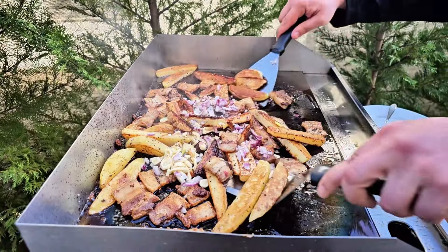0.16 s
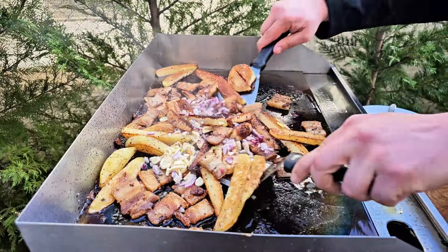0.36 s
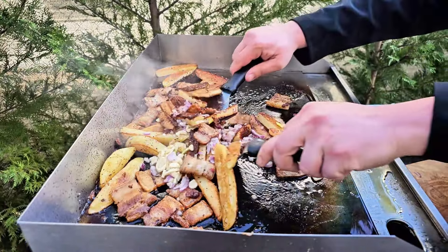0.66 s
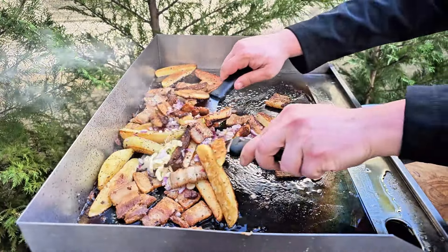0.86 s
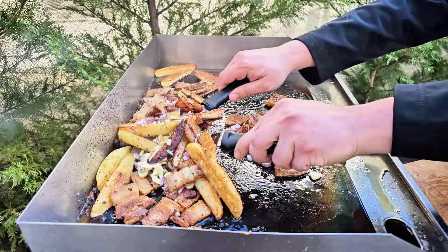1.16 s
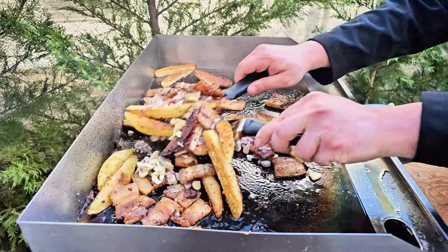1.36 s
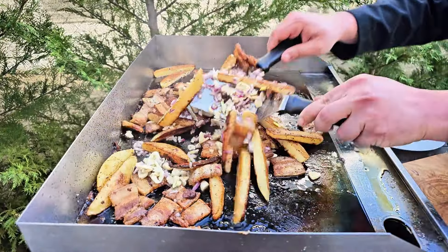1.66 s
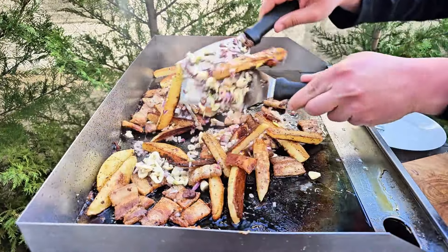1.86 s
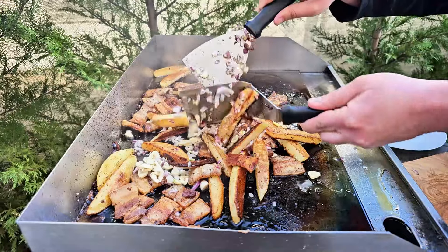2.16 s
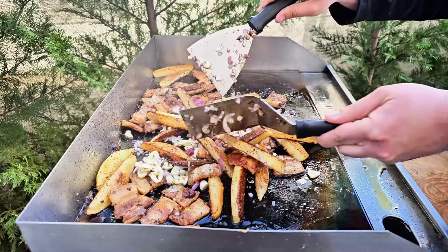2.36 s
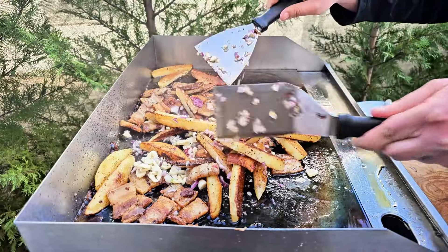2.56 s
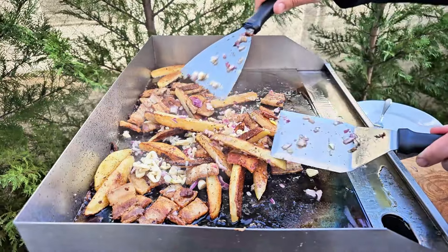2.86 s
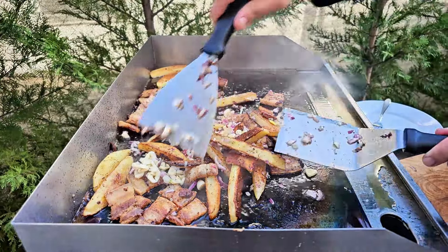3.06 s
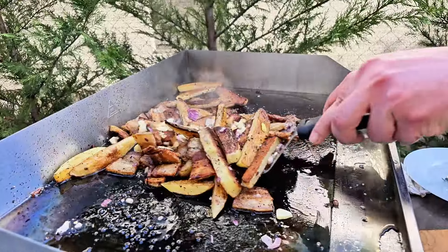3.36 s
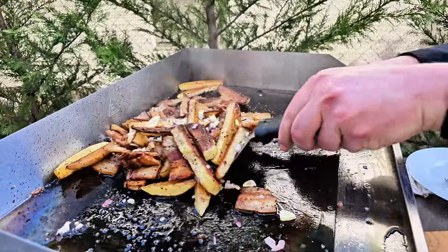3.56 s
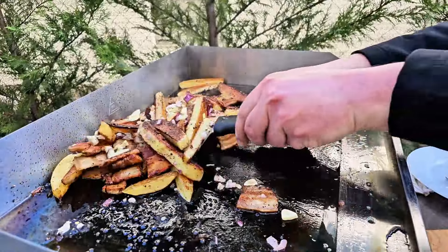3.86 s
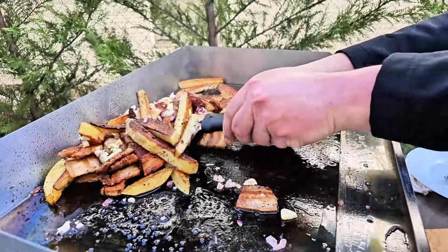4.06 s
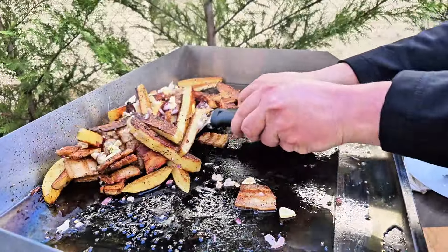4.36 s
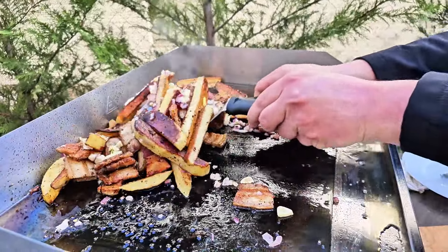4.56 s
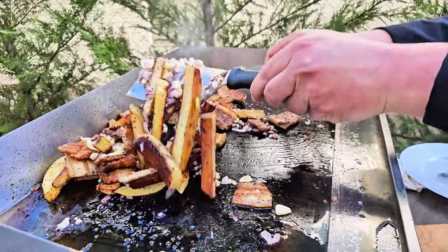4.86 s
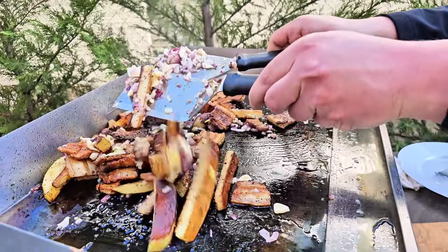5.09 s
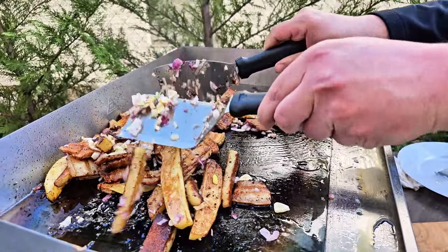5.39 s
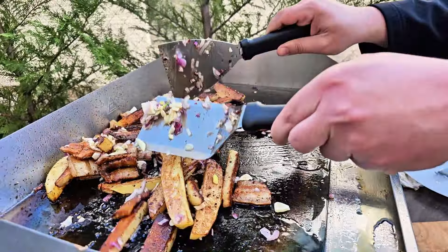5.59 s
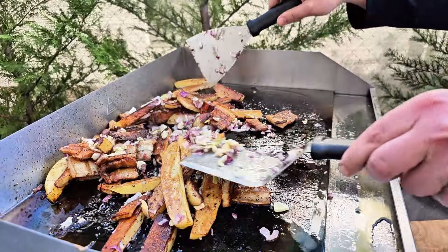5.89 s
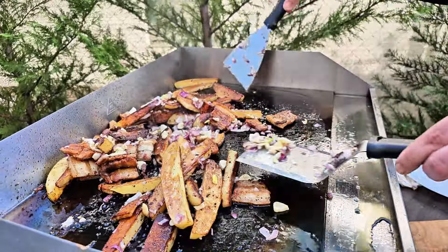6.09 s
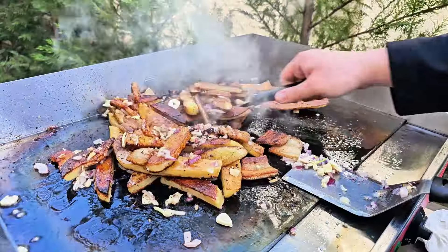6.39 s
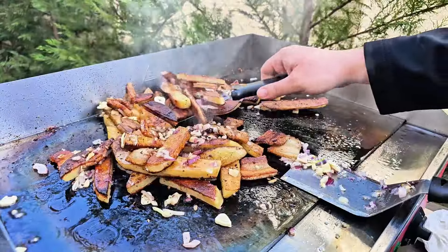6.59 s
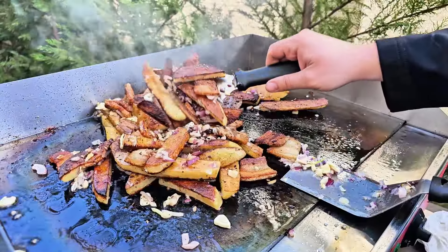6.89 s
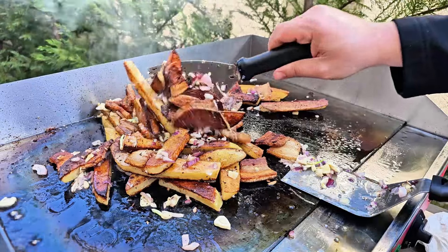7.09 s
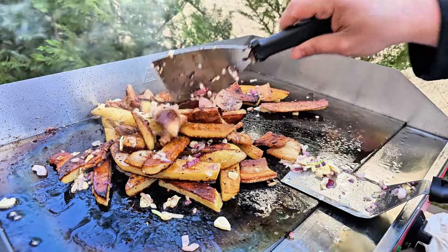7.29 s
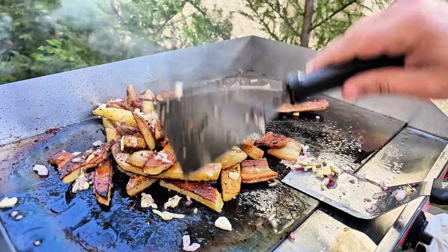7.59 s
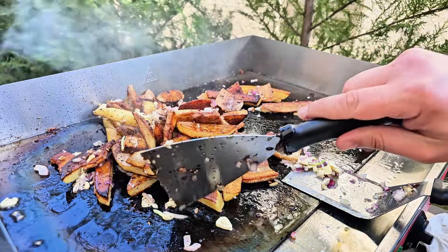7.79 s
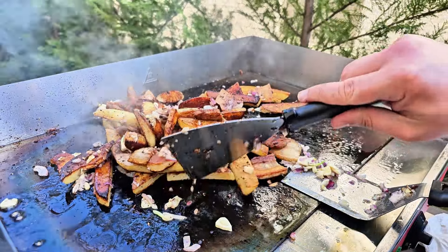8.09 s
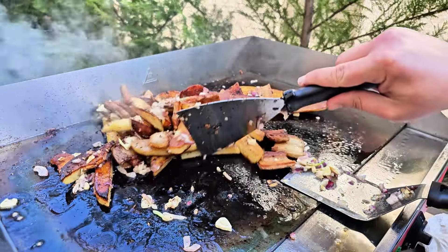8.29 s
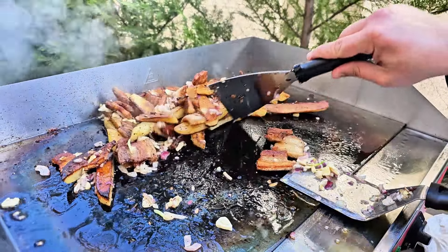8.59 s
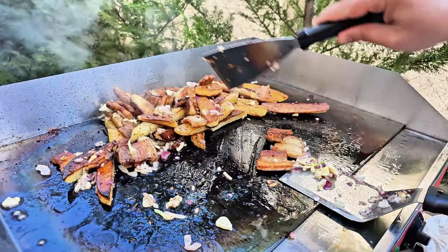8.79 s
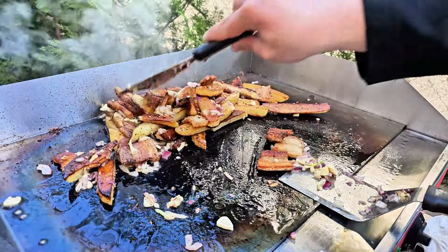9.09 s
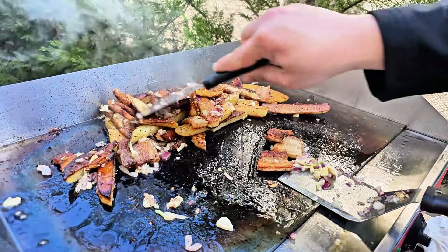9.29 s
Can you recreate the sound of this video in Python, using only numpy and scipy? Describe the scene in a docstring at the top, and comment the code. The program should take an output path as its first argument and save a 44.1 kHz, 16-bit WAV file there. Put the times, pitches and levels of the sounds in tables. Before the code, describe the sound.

Potato wedges and meat fry outdoors, hissing and popping while spatulas slide under them, then clank and scrape on the steel plate.

```python
"""Sizzling outdoor griddle

Potato wedges and meat fry on a steel plate: steam bubbles fizz and fat spits, flaring up as two
spatulas turn the food. Food thuds on the plate; one spatula clanks down and scrapes along the steel.
The microphone stands at three places in turn (front, close, side), over a low rumble.
Wind buffets it at the second place, and a faint hum is heard at the third."""
import sys
import numpy as np
from scipy import signal
from scipy.fft import rfft, irfft, next_fast_len
from scipy.io import wavfile
from scipy.ndimage import uniform_filter1d

SR = 44100
rng = np.random.default_rng(int(sys.argv[2]) if len(sys.argv) > 2 else 0)


def generate_wav(signal):
    """Clip the signal to [-1, 1] and save it as 16-bit WAV at the path in sys.argv[1]."""
    frames = np.transpose(np.atleast_2d(signal))
    scaled = np.clip(frames, -1, 1) * 32767
    pcm = np.round(scaled).astype(np.int16)
    wavfile.write(sys.argv[1], SR, pcm)


N = 416744
TIME, FREQS = np.arange(N) / SR, np.fft.rfftfreq(N, 1 / SR)
FRONT, CLOSE, SIDE = range(3)
TOP_HZ = 15800


def amp(db):
    """Decibels to gain."""
    return 10 ** (np.asarray(db) / 20)


def unit_rms(x):
    """Scales a signal to rms 1."""
    return x / np.sqrt(np.mean(x ** 2) + 1e-20)


def curve(points, hz):
    """Joins (frequency, value) points on a log-frequency axis."""
    f, value = np.transpose(points)
    return np.interp(np.log(hz + 1), np.log(f + 1), value)


def add(mix, start, sound):
    """Lays a sound into the mix at start seconds."""
    part = mix[max(round(start * SR), 0):][:len(sound)]
    part += sound[:len(part)]


def bell(hz, centre_hz, octaves):
    """A bell-shaped gain on the octave axis."""
    return np.exp(-.5 * (np.log2((hz + 1) / centre_hz) / octaves) ** 2)


def bandpass(x, centre_hz, octaves):
    """A sound through a bell filter, at rms 1."""
    return unit_rms(irfft(rfft(x) * bell(np.fft.rfftfreq(len(x), 1 / SR), centre_hz, octaves)))


def noise(colour):
    """Steady noise with the given spectrum, rms 1."""
    return unit_rms(irfft(rfft(rng.standard_normal(N)) * amp(curve(colour, FREQS)), N))


def wander(hz):
    """Smooth random modulation at rms 1, rolling off above hz."""
    size = next_fast_len(N, True)
    spectrum = rfft(rng.standard_normal(size)) / (1 + (np.fft.rfftfreq(size, 1 / SR) / hz) ** 2)
    return unit_rms(irfft(spectrum, size)[:N])


def clicks(per_s, spread_db):
    """Randomly timed clicks of either sign; most are small, a few large."""
    size = amp(spread_db * np.minimum(rng.exponential(1, N), 5))
    return size * rng.choice([-1, 1], N) * (rng.random(N) < per_s / SR)


def swell(start, length, rise_s, fall_s):
    """An envelope that rises, holds until its length is up, and dies away."""
    attack = np.clip((TIME - start) / rise_s, 0, 1)
    return attack * np.exp(-np.maximum(TIME - start - length, 0) / fall_s)


def ride(swells, floor_db, rise_s, fall_s):
    """A fader ride: swells on top of a steady floor."""
    return amp(floor_db) + sum(amp(db) * swell(s, length, rise_s, fall_s) for s, length, db in swells)


def mic_place():
    """Where the microphone stands at each sample: FRONT, CLOSE or SIDE."""
    return np.searchsorted([move[0] for move in MIC_MOVES], TIME)


# tone of the outdoor bed: (frequency [Hz], level [dB])
RUMBLE_EQ = [(20, -38), (45, -13), (80, 3), (130, -8.5), (200, -4), (400, -38), (1000, -48)]
# swells of the bed: (start [s], length [s], level [dB])
RUMBLE_SWELLS = [(1.78, 0.14, -63), (2.85, 0.14, -60), (6.35, 0.37, -54), (7.1, 1.4, -65)]


def rumble(heave_db=0.5):
    """A low outdoor rumble that heaves gently."""
    level = ride(RUMBLE_SWELLS, floor_db=-63, rise_s=0.1, fall_s=0.18)
    return noise(RUMBLE_EQ) * level * amp(heave_db * wander(hz=4.2))


# swells of the hum: (start [s], length [s], level [dB])
HUM_SWELLS = [(6.373, 0.12, -54), (7.437, 0.85, -52)]


def hum(pitch_hz=162.5, sag_hz_per_s=2.8, wobble_hz=2.08, waver_db=4.0):
    """A faint wavering hum at the side position, slowly sinking in pitch."""
    arrival = MIC_MOVES[1][0]
    hz = pitch_hz - sag_hz_per_s * (TIME - arrival) + wobble_hz * wander(hz=7.1)
    tone = np.sqrt(2) * np.sin(2 * np.pi * np.cumsum(hz) / SR)
    level = ride(HUM_SWELLS, floor_db=-68.5, rise_s=0.11, fall_s=0.16)
    return tone * level * amp(waver_db * wander(hz=4.4)) * (mic_place() == SIDE)


# tone of wind on the microphone: (frequency [Hz], level [dB])
WIND_EQ = [(15, -47), (25, -61), (56, -1), (91, 2), (200, -7.5), (274, -13), (385, -20.5), (450, -21),
           (580, -24), (990, -120)]
# gusts: (start [s], length [s], level before trim [dB])
GUSTS = [(3.17, 0.21, -38.5), (3.41, 0.11, -39), (3.745, 0.054, -41), (3.907, 0.024, -52),
         (4.095, 0.025, -39), (4.32, 0.062, -41), (4.535, 0.11, -44), (4.77, 0.063, -28),
         (4.933, 0.36, -37.5), (5.425, 0.14, -34.5), (5.63, 0.064, -33.5), (5.795, 0.019, -38.5),
         (5.894, 0.32, -35.5), (6.262, 0.041, -28), (6.367, 0.019, -33)]
# single thumps of wind: (time [s], level [dB], pitch [Hz])
WIND_THUMPS = [(3.324, -23.5, 122), (4.125, -30, 122), (4.214, -27.5, 96), (4.822, -21, 107),
               (5.183, -20, 167), (5.927, -30, 110), (6.29, -37, 84), (6.303, -21.5, 127)]


def wind(trim_db=-2, lumpy_db=2.5):
    """Gusts over a light breeze make lumpy eddies on the microphone, with a few single thumps."""
    strength = ride(GUSTS, floor_db=-46.5, rise_s=0.013, fall_s=0.011)
    out = noise(WIND_EQ) * strength * amp(trim_db + lumpy_db * wander(hz=47)) * (mic_place() == CLOSE)
    t = np.arange(SR // 10) / SR
    for s, db, hz in WIND_THUMPS:
        envelope = np.exp(-((hz * t - 1.4) / 0.72) ** 2)  # about two cycles long
        add(out, s - 1 / hz, amp(db) * np.sin(2 * np.pi * hz * t) * envelope)
    return out


def friction(length_s, modes, grit_db, locking):
    """Uneven slips of a sliding blade pass through resonances, fading in and out over the stroke."""
    size = SR * 2
    hz = np.fft.rfftfreq(size, 1 / SR)
    roughness = unit_rms(uniform_filter1d(rng.standard_normal(size), size=500))
    slips = clicks(per_s=1700, spread_db=2.0)[:size] * amp(grit_db * roughness)
    body = sum(amp(db) * (1 + 1j * (hz - f) / (.78 * width)) ** -2 for f, width, db in modes)
    rub = irfft(rfft(slips) * body, size)[:round(length_s * SR)]
    # the slips lock on to a sharp resonance, which steadies its loudness
    steadiness = locking / (1 + (modes[0][1] / 80) ** 2)
    envelope = abs(signal.hilbert(unit_rms(rub))) + .05
    return unit_rms(rub / envelope ** steadiness) * signal.windows.tukey(len(rub), .6)


# resonances of each spatula, by name: (frequency [Hz], width [Hz], level [dB])
SPATULA_MODES = {"scraper": [(1850, 120, -1), (2260, 210, -1), (3370, 200, 1), (3970, 230, -2.5),
                 (5500, 220, -1), (6480, 240, -1), (8700, 900, -1)], "turner": [(1340, 180, 0),
                 (1850, 140, -6), (3000, 500, -2), (3600, 280, -3), (5200, 380, -4), (7200, 150, -5),
                 (8650, 300, -15)]}
# light slides under the food: (spatula, start [s], end [s], level [dB], tone centre [Hz])
STROKES = [("scraper", 0.03, 0.8, -41.5, 2700), ("scraper", 0.35, 0.91, -40, 4400),
           ("scraper", 1.03, 1.68, -46, 4500), ("scraper", 1.2, 2.4, -47, 2800),
           ("turner", 2.6, 2.95, -43, 3700), ("turner", 3.13, 3.33, -39, 2800),
           ("turner", 3.164, 3.5, -40, 7500), ("turner", 3.6, 4.24, -44.5, 1760),
           ("turner", 3.6, 5, -48, 5100), ("turner", 4.58, 4.76, -40, 4500),
           ("turner", 4.75, 6, -41.5, 5200), ("scraper", 6.427, 6.72, -51, 1400),
           ("scraper", 6.88, 7.45, -50, 1300), ("scraper", 8.02, 8.18, -35.5, 5700),
           ("scraper", 8.2, 8.5, -40, 6900), ("scraper", 8.33, 8.75, -42, 1400)]


def spatula_strokes(octaves=0.43):
    """A sliding spatula grates in its own resonances, most in those near the stroke's tone centre."""
    out = np.zeros(N)
    for spatula, start, end, db, centre_hz in STROKES:
        driven = [(hz, width, mode_db + 20 * np.log10(bell(hz, centre_hz, octaves)))
                  for hz, width, mode_db in SPATULA_MODES[spatula]]
        add(out, start, amp(db) * friction(end - start, driven, grit_db=3, locking=0.39))
    return out


# notes of the rubbed plate: (start [s], end [s], level [dB], pitch [Hz])
PLATE_NOTES = [(0, 0.196, -49.5, 221), (0.18, 0.813, -52, 199.5), (6.434, 6.69, -52.5, 399),
               (8.012, 8.141, -39, 740), (8.046, 8.495, -39, 348), (8.248, 8.648, -42, 727)]


def plate_singing(width_hz=12.6):
    """Now and then a rubbing spatula makes the plate sing on one narrow resonance."""
    out = np.zeros(N)
    for start, end, db, hz in PLATE_NOTES:
        add(out, start, amp(db) * friction(end - start, [(hz, width_hz, 0)], grit_db=3.5, locking=0.69))
    return out


# modes of the steel plate: (frequency [Hz], level [dB], decay to -60 dB [s])
PLATE_MODES = [(196, -5, 0.66), (219, -5, 0.86), (291, -27, 1), (344, -5, 0.99), (356, -6, 0.64),
               (407.5, -6.5, 0.33), (458, -11, .25), (534, 1.5, 0.39), (660, -26, 0.16), (742, 3.5, 0.47),
               (756, 0, 0.96), (820, -1.5, 0.62), (744, -1, 0.54), (977, -3.5, 0.21), (1030, -14, 0.23),
               (1107, -3, 0.26), (1330, -11, 0.48), (1527, -11, 0.95), (1850, -3, 0.31), (2330, -25, .2),
               (2730, -14, 0.4)]


def plate_ring(centre_hz, octaves):
    """The struck plate rings in decaying modes, weighted by how the hit drives them."""
    hz, db, t60 = np.transpose(PLATE_MODES)[:, :, None]
    t = np.arange(SR) / SR
    weight = amp(db) * bell(hz, centre_hz, octaves)
    modes = rng.choice([-1, 1], hz.shape) * amp(-60 * t / t60) * np.sin(2 * np.pi * hz * t)
    return (weight * modes).sum(0) / np.linalg.norm(weight)


# tone of the clatter under a hit: (frequency [Hz], level [dB])
CLATTER_EQ = [(80, -39), (190, -3.5), (800, -7), (1150, -6), (1600, 3.5), (2300, -2.5), (3000, -5),
              (3700, -28), (8000, -17)]
# tail of the clatter: (frequency [Hz], decay to -60 dB [s])
CLATTER_DECAY = [(200, 0.78), (800, 0.43), (1600, 0.072), (3200, 0.16)]
# thuds and clanks: (time [s], ring level [dB], tone centre [Hz], width [octaves], clatter vs ring [dB])
PLATE_HITS = [(.163, -48.5, 500, 1.1, 7), (.785, -41, 291, 0.089, -19), (0.8, -50.5, 450, 1.4, 7),
              (1.544, -44.5, 202, 0.46, -7), (1.701, -40, 197, 0.74, -14), (1.847, -32.5, 200, 0.67, -7.5),
              (1.886, -36.5, 354, 0.32, -11), (2.441, -42.5, 330, 1.4, -8), (6.448, -46, 400, 0.27, -12),
              (6.627, -46, 1180, 1.9, 6), (7.7389, -19.5, 950, 2.8, -1), (7.843, -34, 1290, 0.72, -5),
              (8.853, -51, 546, 0.82, 3), (8.969, -44.5, 1020, 0.25, -0.5)]


def plate_hits():
    """Food and blades land on the plate: a few modes ring on above a clatter of short-lived ones."""
    out = np.zeros(N)
    for s, db, centre_hz, octaves, clatter_db in PLATE_HITS:
        hz, t, bands = signal.stft(rng.standard_normal(SR // 2), SR, nperseg=512)
        hz = hz[:, None]
        decay = amp(curve(CLATTER_EQ, hz) - 60 * t / curve(CLATTER_DECAY, hz))
        clatter = signal.istft(bands * decay * bell(hz, centre_hz, octaves), nperseg=512)[1]
        add(out, s, amp(db + clatter_db) * clatter / clatter[:SR // 50].std())
        add(out, s, amp(db) * plate_ring(centre_hz, octaves))
    return out


# resonances of the blade pressed on the plate: (frequency [Hz], width [Hz], level [dB])
BLADE_MODES = [(385, 160, -2.5), (737, 24, -8.5), (940, 70, -8.5), (1040, 70, -4.5), (1500, 50, -10),
               (1850, 89, -7.5), (2330, 100, -24)]
# hard drags over the steel: (start [s], length [s], drive [dB], tone centre [Hz])
DRAGS = [(7.995, 0.089, -39, 900), (8.193, 0.19, -31.5, 950)]


def scrape(ring_db=-8, blade_db=-1):
    """The blade sticks and slips; the slips ring the blade and the plate under it."""
    grit = unit_rms(clicks(per_s=1500, spread_db=1.5))
    drags = [(grit * amp(db) * swell(s, length, rise_s=0.039, fall_s=0.13), centre_hz)
             for s, length, db, centre_hz in DRAGS]
    t, blade = np.arange(SR // 5) / SR, np.zeros(N)
    for hz, width, db in BLADE_MODES:
        mode = np.exp(-np.pi * width * t) * np.cos(2 * np.pi * hz * t)
        drive = sum(slips * bell(hz, centre_hz, octaves=1.22) for slips, centre_hz in drags)
        blade += amp(db) * signal.oaconvolve(drive, mode / np.linalg.norm(mode))[:N]
    ring = plate_ring(centre_hz=900, octaves=1.8)
    plate = signal.oaconvolve(sum(slips for slips, _ in drags), ring / np.linalg.norm(ring))[:N]
    return amp(blade_db) * blade + amp(ring_db) * plate


# pops of fat and clacks of blades: (time [s], rough peak [dB], tone centre [Hz], width [octaves])
POPS = [(.162, -0.5, 4570, 0.74), (0.1632, -12, 1500, 1.1), (0.704, -13.5, 6400, 0.36),
        (1.154, -20, 1800, 1), (2.031, -8, 6500, 2.1), (3.283, -9, 6000, 1.7), (3.5956, -15, 7300, 1.4),
        (4.092, -17, 4500, 2.1), (4.132, -13, 8800, 3.5), (4.653, -13, 5500, 1.4), (4.868, -12, 12000, 1),
        (5.008, -11, 3500, 1.4), (6.205, -16, 7000, 0.8), (6.5215, -9.5, 7300, 0.44),
        (6.628, -19, 5000, 2.1), (6.692, -19, 6000, 0.6), (6.85, -13, 6000, 1.3),
        (6.951, -17.5, 4930, 0.59), (7.1917, -18, 6000, 1), (7.5527, -8, 10000, 1.7),
        (7.6485, -13, 8200, 1.4), (7.905, -16.5, 5100, 0.92), (8.015, -13, 4300, 0.98),
        (8.13, -11, 6500, 0.85), (8.14, -9.5, 10000, 1.1), (8.241, -14, 7000, .8), (8.3569, -15, 5000, 1.3),
        (8.8514, -4.5, 12500, 1.66)]


def pops(crest_db=12.5, snap_s=0.00061, spray_s=0.0048, echo_s=0.006):
    """Each pop is a sharp snap, a few milliseconds of tearing spray, and a faint echo off the steel."""
    t, out = np.arange(2048) / SR, np.zeros(N)
    envelope = 0.99 * np.exp(-t / snap_s) + np.exp(-(t / spray_s) ** 2) + .04 * np.exp(-t / echo_s)
    for s, db, hz, octaves in POPS:
        add(out, s, amp(db - crest_db) * bandpass(rng.standard_normal(len(t)), hz, octaves) * envelope)
    return out


def spits(per_s, spread_db, kinds=24):
    """Bursting droplets: each kind is a short, sharply starting burst of its own pitch and length."""
    t, out = np.arange(512) / SR, np.zeros(N)
    for hz in np.geomspace(1000, 14000, kinds):
        life_s = rng.uniform(0.0016, 0.0051) * (5000 / hz) ** 0.28
        burst = rng.standard_normal(len(t)) * np.exp(-t / life_s) * (t > .001)
        droplet = bandpass(burst, hz, octaves=0.41) * hz ** 0.28
        out += signal.oaconvolve(clicks(per_s / kinds, spread_db), droplet)[:N]
    return unit_rms(out)


def patchy(x, depth_db):
    """Single pieces of food flare up and fade, each in its own range of pitch."""
    bands = signal.stft(x, nperseg=256)[2]
    patches = uniform_filter1d(rng.standard_normal(bands.shape), size=9, axis=0)
    patches = unit_rms(uniform_filter1d(patches, size=14, axis=1))
    return unit_rms(signal.istft(bands * amp(depth_db * patches), nperseg=256)[1][:N])


def steam_spurts(decay_s=0.051, depth=0.52):
    """A gain that jumps as pockets of steam break out, then dies away."""
    breaks = abs(clicks(per_s=130, spread_db=7.5))
    spurts = unit_rms(signal.lfilter([1], [1, -np.exp(-1 / (decay_s * SR))], breaks))
    return np.sqrt(1 + depth * spurts)


def early_echoes(x, echo_db=-12, count=8):
    """Adds faint reflections off the griddle walls and the moving hands."""
    delays = rng.uniform(.002, .014, count)
    sway = 1 + 0.0202 * wander(hz=2.1)
    echoes = sum((-1) ** k * np.interp(TIME - delay * sway, TIME, x) for k, delay in enumerate(delays))
    return unit_rms(x + amp(echo_db) * unit_rms(echoes))


# food lying still, one row per microphone place: (fizz [dB], wet bubbling vs fizz [dB])
RESTING_FOOD = [(-31, -9), (-33, -10), (-37.5, -7.5)]
# wet food pushed on to hot steel flares up and dries off:
# (start [s], push [s], fizz [dB], wet bubbling vs fizz [dB], drying time [s])
TURNS = [(-0.1, 0.16, -28.5, -8, 0.3), (0.16, 0.029, -26, -13.5, 0.23), (0.3, 0.22, -28.3, -10, 0.12),
         (1.25, 0.6, -26.5, -10.5, 0.41), (1.95, 0.44, -31.5, -12.5, 1), (2.75, 0.21, -31.5, -17, 0.16),
         (3.14, 0.036, -29, -10, 0.3), (3.35, 0.08, -31, -9.5, 0.24), (3.55, 0.039, -33.5, -5.5, 0.38),
         (4.61, 0.069, -30.5, -8.5, 0.96), (4.72, 0.36, -30.5, -14, 1), (5.45, 0.14, -27.5, -15.5, 0.27),
         (6.39, 0.03, -42, -1.5, 0.089), (7.17, 0.18, -35, -10.5, 1), (8.02, 0.092, -28.5, -14, 0.067),
         (8.19, 0.12, -30.5, -25, 0.47)]


def frying_levels():
    """Fizz level and wet bubbling against it, in dB: each turn adds steam to that of the resting food."""
    rest_db, rest_wet_db = np.array(RESTING_FOOD)[mic_place()].T
    fizz, wet = amp(rest_db) ** 2, amp(rest_db + rest_wet_db) ** 2
    for s, push, db, wet_db, drying in TURNS:
        power = amp(db) ** 2 * swell(s, push, rise_s=push, fall_s=drying)
        fizz += power
        wet += power * amp(wet_db) ** 2
    return 10 * np.log10(fizz), 10 * np.log10(wet / fizz)


# tone of the sizzle from each microphone place: (frequency [Hz], level [dB])
FRONT_EQ = [(150, -14), (400, -8), (750, -7.5), (1050, -11), (1600, -4.5), (2300, -1.5), (2900, -4.5),
            (3800, 0.5), (5500, 0), (7300, 1.5), (9000, 1.5), (11000, -1.5), (13200, -2.5), (15500, 3)]
CLOSE_EQ = [(150, -15), (400, -5), (800, -4), (1350, -4.5), (1650, -4), (2200, -1), (4300, -2), (5500, -2),
            (8000, -1), (10000, -2.5), (13000, -5), (14300, -1), (15600, 2.5)]
SIDE_EQ = [(150, -5.5), (450, -1), (750, 2), (1100, 3.5), (1600, 2.5), (1900, 7), (2900, 1.5), (4500, 0.5),
           (7000, -0.5), (10000, -2), (12800, -5.5), (14300, 0), (15600, 5)]
# reflection off the steel rim, one row per place: (delay [s], gain [linear])
RIM_ECHO = [(0.00065, -0.033), (0.000547, 0.047), (0.000545, 0.012)]


def sizzle(spit_db=-6, front_spit_db=-1.5, flutter_db=0.63, fizz_trim_db=-0.33, wet_trim_db=-1.5):
    """Countless steam bubbles burst in the fat; the steel rim echoes them with a drifting delay."""
    place = mic_place()
    fizz_db, wet_db = frying_levels()
    bubbles = unit_rms(clicks(per_s=22000, spread_db=1))
    # single droplets stand out more when the frying is quiet, and less from the front
    spit_gain = amp(spit_db - 0.57 * (fizz_db - fizz_db.mean()) + front_spit_db * (place == FRONT))
    crackle = patchy(bubbles + spit_gain * spits(per_s=700, spread_db=3.0), depth_db=-0.12)
    crackle *= amp(flutter_db * wander(hz=47)) * steam_spurts()
    crackle = early_echoes(crackle / np.sqrt(1 + spit_gain ** 2))
    lows = 1 / (1 + (FREQS / 3600) ** 4)  # crossover: wet bubbling below, fizz above
    drift = 1 + 0.024 * wander(hz=0.82)
    out = np.zeros(N)
    for k, (eq, (delay, gain)) in enumerate(zip([FRONT_EQ, CLOSE_EQ, SIDE_EQ], RIM_ECHO)):
        rim = gain * np.interp(TIME - delay * drift, TIME, crackle)
        spectrum = rfft(crackle + rim) * amp(curve(eq, FREQS)) * (FREQS < TOP_HZ)
        fizz = unit_rms(irfft(spectrum * (1 - lows), N))
        wet = unit_rms(irfft(spectrum * lows, N))
        out += (place == k) * (amp(fizz_trim_db) * fizz + amp(wet_db + wet_trim_db) * wet)
    return out * amp(fizz_db)


def scene():
    """All sources reach one microphone, alike in both channels."""
    outdoors = rumble() + hum() + wind()
    steel = spatula_strokes() + plate_singing() + plate_hits() + scrape()
    mono = outdoors + steel + pops() + sizzle()
    return np.array([mono, mono])


# brief dropouts as the microphone changes place: (time [s], silent half-width [s], fade [s])
MIC_MOVES = [(3.14, 0.0066, 0.014), (6.397, 0.00041, 0.0046)]


def record(dry):
    """The sound drops out at each change of place, and a steep low-pass trims the top."""
    dips = [np.clip((abs(TIME - s) - half) / fade, 0, 1) for s, half, fade in MIC_MOVES]
    lowpass = signal.firwin(511, TOP_HZ, window=("kaiser", 9), fs=SR)
    return signal.oaconvolve(dry * np.prod(dips, axis=0), lowpass[None], "same")


dry = scene()
out = record(dry)
generate_wav(out)
```